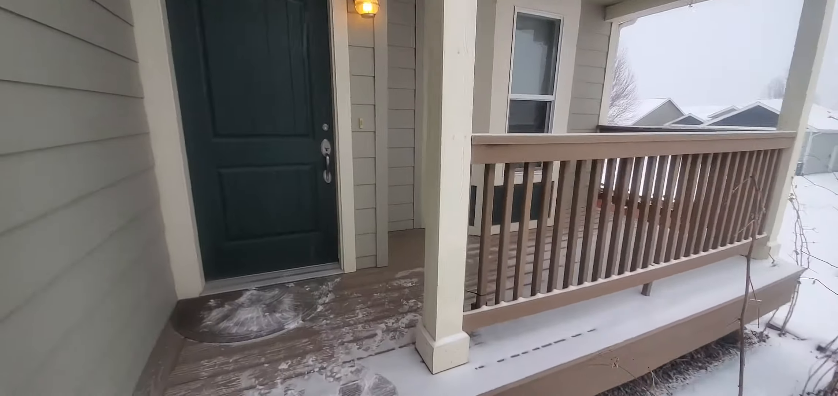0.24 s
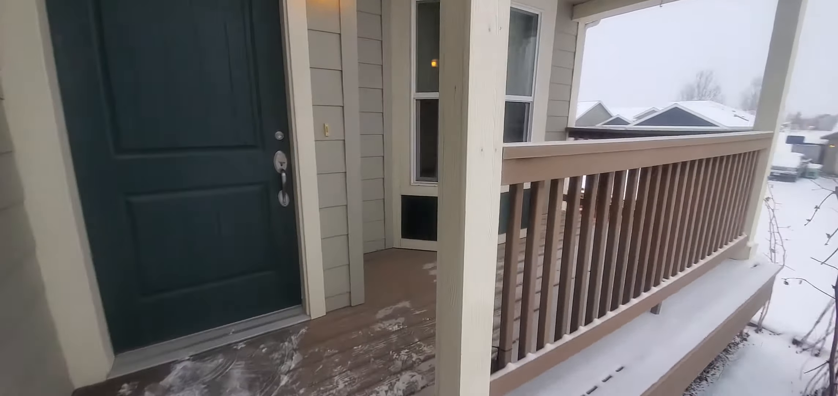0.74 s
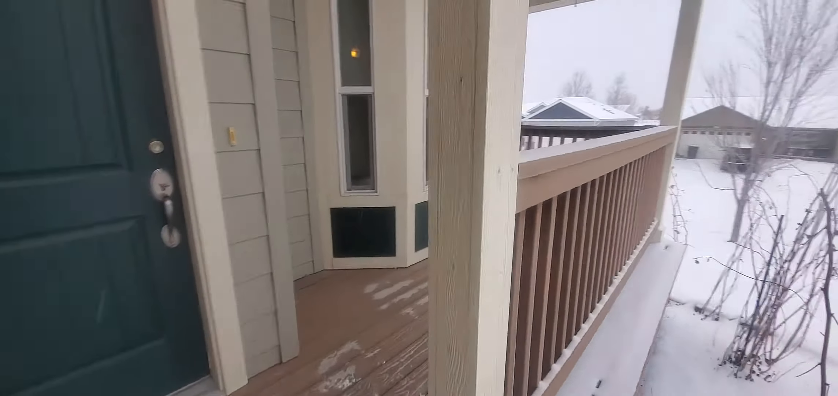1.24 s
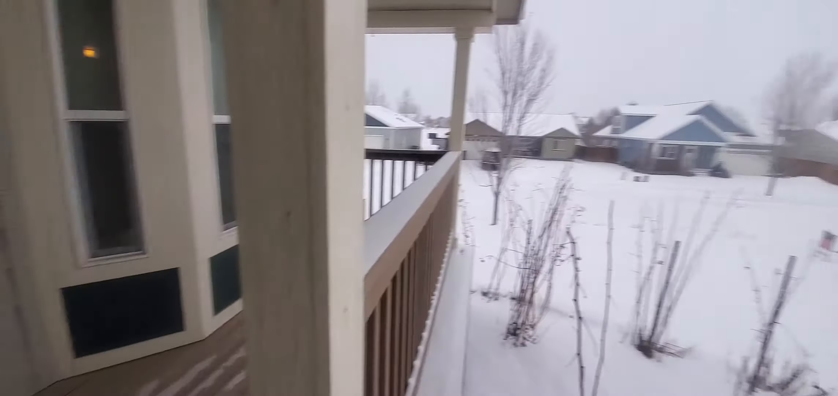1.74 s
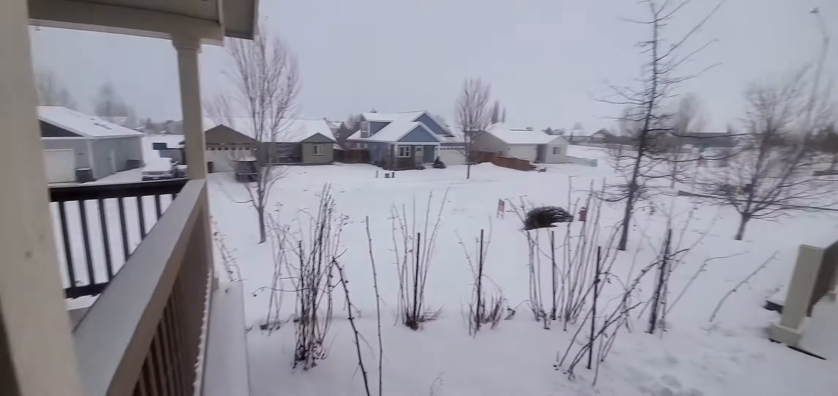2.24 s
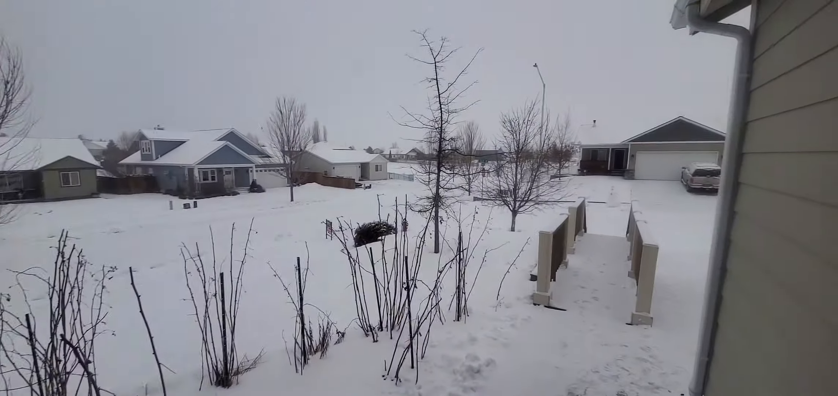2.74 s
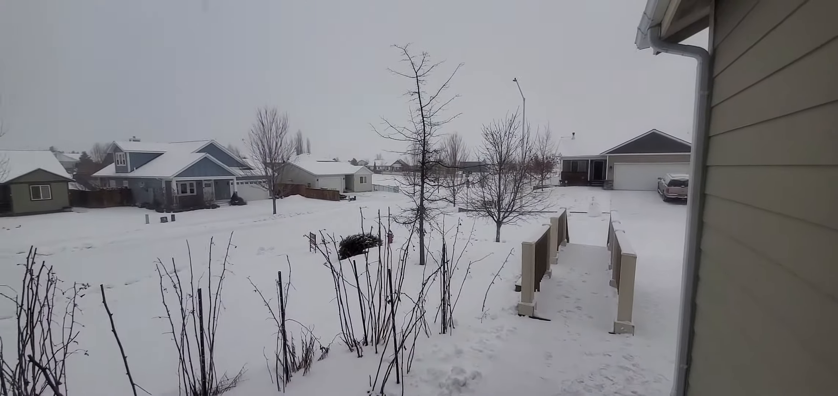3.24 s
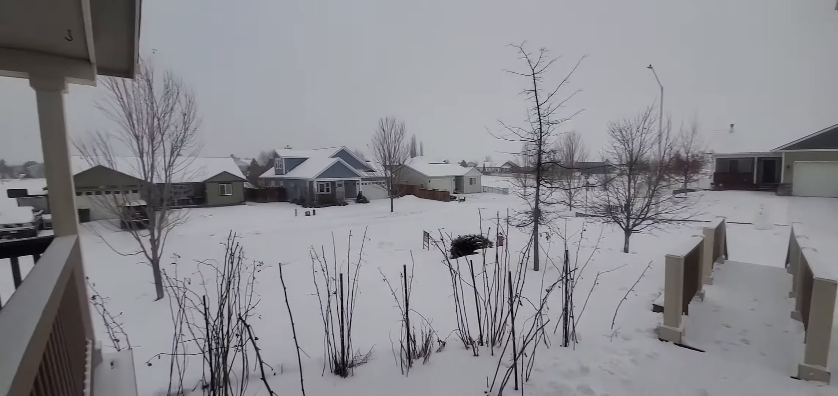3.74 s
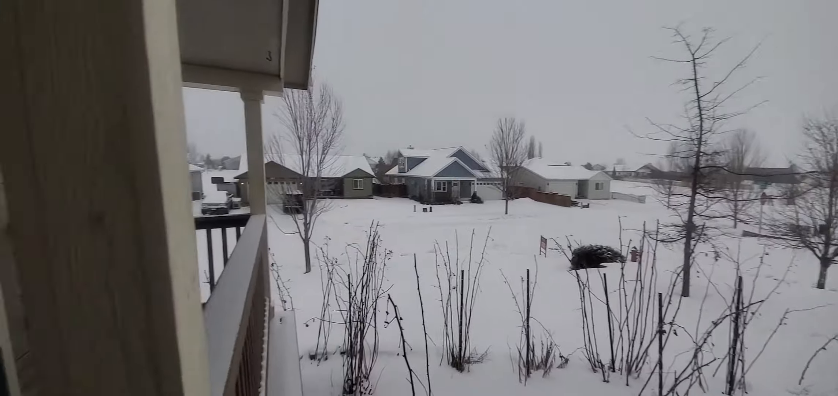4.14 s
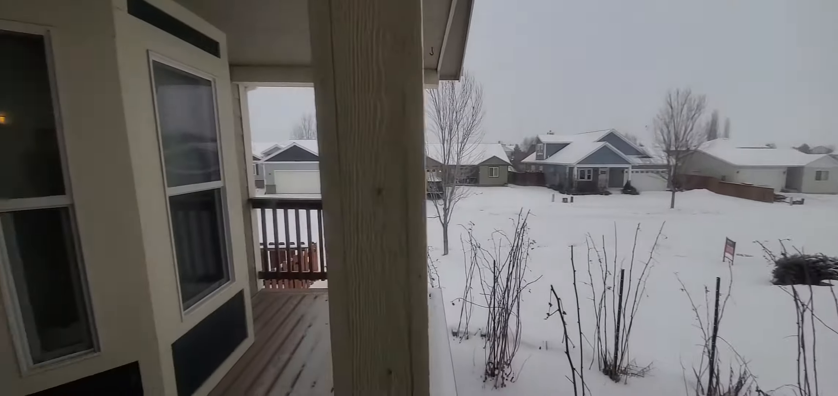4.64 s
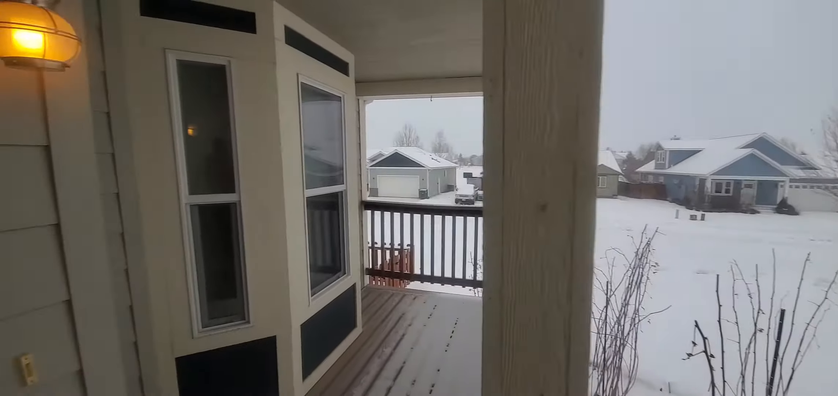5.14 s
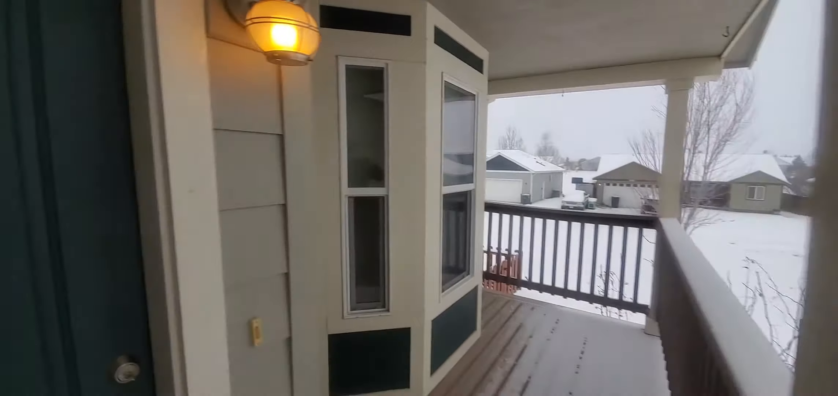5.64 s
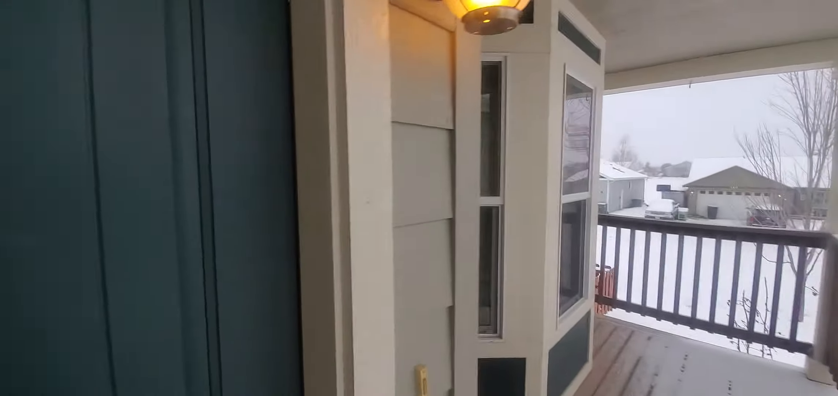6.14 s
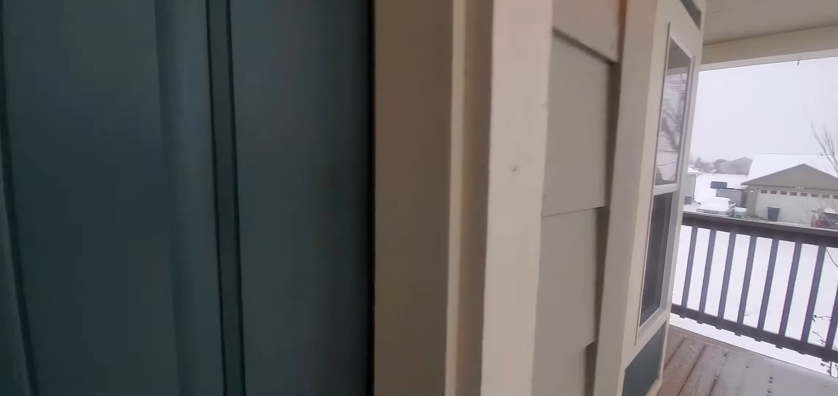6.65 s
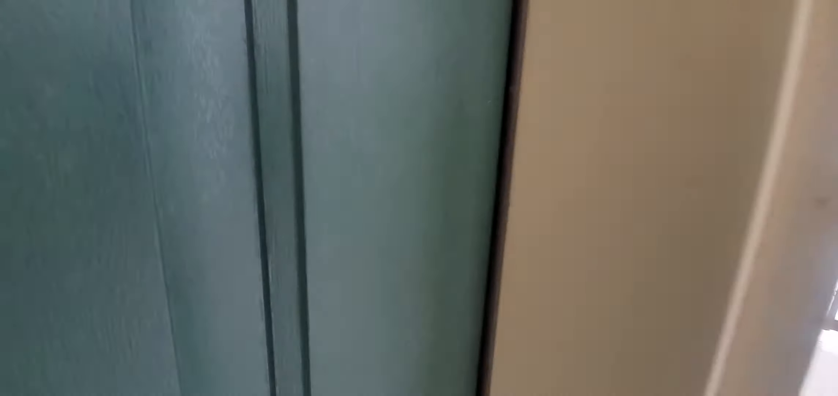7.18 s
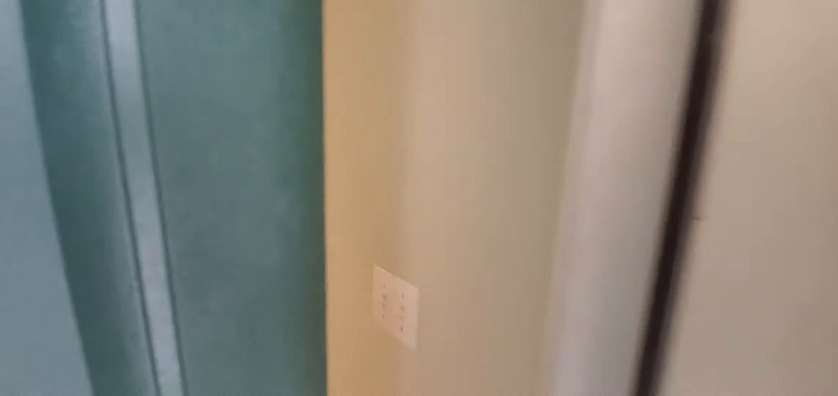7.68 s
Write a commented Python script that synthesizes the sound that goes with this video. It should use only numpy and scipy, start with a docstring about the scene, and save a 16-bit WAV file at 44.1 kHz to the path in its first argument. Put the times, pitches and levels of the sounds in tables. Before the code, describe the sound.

Snow crackles under shifting boots beside a quiet street; heavy thumps hit a porch deck, followed by a sharp metallic latch clack and door boom.

```python
"""Boots crunch through snow, stop on bare boards and stamp three times; a latch rattles and a door is jolted.
Snow is grainy noise and damped rings under a load curve; deck and door are ringing modes with slaps of noise.
Latch and spindle add steel noise, knocks and a rising squeak; a porch tail answers.
Wind and grip rumble on both ports of a handheld camera and knocks hit its shell, under a treble hiss
of clothes and air, mostly above 8 kHz, strongest near 12.6 kHz where the microphone resonates."""
import sys
import numpy as np
from scipy import signal
from scipy.fft import rfft, irfft, next_fast_len
from scipy.io import wavfile
from scipy.ndimage import uniform_filter1d, map_coordinates

SR = 44100
rng = np.random.default_rng(int(sys.argv[2]) if len(sys.argv) > 2 else 0)


def file_out(sig):
    """Save sig as 16-bit WAV at sys.argv[1]."""
    # one column per channel
    cols = np.atleast_2d(sig).T
    # limit, then scale
    lim = np.clip(cols, -1, 1)
    pcm = np.round(lim * 32767).astype(np.int16)
    wavfile.write(sys.argv[1], SR, pcm)


def volts_from_db(level):
    """Convert decibel levels to linear amplitude ratios."""
    exponent = np.asarray(level, float) / 20
    return 10 ** exponent


N = 348988


def unit(x):
    """Scaled to rms 1."""
    return x / np.sqrt(np.mean(x ** 2) + 1e-20)


def stereo_noise():
    """Unrelated white noise for the two ports."""
    return rng.standard_normal((2, N))


def decay(t, t60_s):
    """Exponential fall of 60 dB in t60_s."""
    return volts_from_db(-60 * t / t60_s)


def onset(t, rise_s):
    """Exponential approach to 1 with time constant rise_s."""
    return 1 - np.exp(-t / rise_s)


def along(points, hz):
    """Points of frequency and value read on a log frequency axis."""
    f, v = np.transpose(points)
    return np.interp(np.log(hz + 1), np.log(f + 1), v)


def curves(rows):
    """One value per sample for each column after the time."""
    s, *cols = np.transpose(rows)
    return [np.interp(np.arange(N) / SR, s, c) for c in cols]


def wobble(rate_hz):
    """Smooth random curve for each port, rate_hz knots a second (below 60)."""
    knots = rng.standard_normal((2, int(N * 60 / SR) + 4))
    return np.array([map_coordinates(k, [np.arange(N) * rate_hz / SR]) for k in knots])


def filtered(x, response):
    """x times a complex response of frequency."""
    m = next_fast_len(x.shape[-1] + 8192)
    return irfft(rfft(x, m) * response(np.fft.rfftfreq(m, 1 / SR)), m)[..., :x.shape[-1]]


def coloured(x, spectrum):
    """x shaped by the given spectrum, rms 1."""
    return unit(filtered(x, lambda hz: volts_from_db(along(spectrum, hz))))


def resonance(hz, width_hz):
    """Causal response of one damped mode."""
    return lambda f: 1j * f * width_hz / (hz * hz - f * f + 1j * f * width_hz)


def sides(pan_db):
    """Column of left and right gains, pan_db apart."""
    return volts_from_db(np.array([[pan_db / 2], [-pan_db / 2]]))


def add(track, s, sound):
    """Mix a sound in at time s."""
    part = track[..., round(s * SR):][..., :sound.shape[-1]]
    part += sound[..., :part.shape[-1]]


# likeness of the two ports: freq_hz, correlation (0-1)
PORT_LIKENESS = [(60, 0.027), (150, 0.1), (380, 0.74), (950, 0.093), (2380, 0.12), (5980, 0.0082),
                 (15000, 0.01)]


def paired(pair):
    """Two unrelated signals mixed, as sum and difference, to the likeness of the two ports."""
    def mid_side(hz):
        turn = np.arccos(np.clip(along(PORT_LIKENESS, hz), -1, 1)) / 2
        return np.array([np.cos(turn), np.sin(turn)])

    mid, side = filtered(pair, mid_side)
    return np.array([mid + side, mid - side])


def grainy(rate_hz, spread_db, life_s):
    """Noise in short bursts of uneven size, timed alike at both ports."""
    hits = rng.random(N) < rate_hz / SR
    sizes = hits * volts_from_db(spread_db * rng.exponential(1, N).clip(0, 4))
    shape = signal.lfilter([1], [1, -np.exp(-1 / (life_s * SR))], sizes)
    return paired(shape * stereo_noise())


# quiet street: freq_hz, relative_db
STREET_SPECTRUM = [(180, -23), (300, 4.5), (411, -3.5), (520, 1.5), (774, -7.5), (1920, -19), (7170, -72.5),
                   (8000, -68), (10400, -29), (17600, -120)]


def street():
    """Steady coloured noise of a quiet street."""
    return volts_from_db(-65.5) * coloured(paired(stereo_noise()), STREET_SPECTRUM)


# boots taking weight, shifting, turning: full_load_s, loading_s, unloading_s, crunch_db, thud_db
STEPS = [(0.0, .05, .15, -49, -54), (0.2, 0.16, 0.15, -42, -43), (0.45, 0.22, 0.75, -53.5, -66),
         (0.709, 0.11, 0.18, -45.5, -41.5), (0.99, 0.05, 0.18, -53, -56), (1.232, 0.22, 0.21, -38.5, -51),
         (1.52, 0.13, 0.049, -61.5, -49), (1.75, 0.24, 0.6, -53.5, -48), (1.949, 0.32, 0.11, -42, -40),
         (2.2, 0.084, 0.082, -87, -48.5), (2.44, 0.06, 0.09, -64.5, -47.5), (2.528, .03, 0.076, -50, -46.5),
         (2.75, .1, 0.19, -59.5, -43.5), (2.9, 0.11, 0.073, -55.5, -45), (3.04, 0.015, 0.11, -66.5, -41.5),
         (3.43, 0.15, 0.043, -81, -47), (3.67, 0.42, 0.21, -63, -49), (3.8, 0.066, 0.37, -62, -59),
         (4.362, 0.17, 0.093, -47.5, -43.5), (4.62, 0.28, 0.36, -61.5, -49),
         (4.919, 0.028, 0.039, -61.5, -47), (5.051, 0.095, 0.054, -61, -47), (5.2, 0.1, 0.13, -49.5, -38),
         (5.45, 0.13, 0.17, -48.5, -41.5), (5.66, .08, 0.082, -65, -51.5), (5.86, .1, 0.18, -53.5, -51),
         (6.37, 0.16, 0.56, -61.5, -57.5), (6.8, 0.087, 0.24, -60.5, -43), (7.3, 0.3, 0.27, -57, -45),
         (7.57, 0.13, 0.27, -57, -47), (7.85, .15, 0.27, -63.5, -60)]


def load():
    """Gains of crunch and thud: each step is 20 dB down a loading or unloading time from full load."""
    s, rise_s, fall_s, crunch_db, thud_db = np.transpose(STEPS)[..., None]
    t = np.arange(0, N / SR + .01, .002)
    away = np.abs((t - s) / np.where(t < s, rise_s, fall_s))
    gains = []
    for db in (crunch_db, thud_db):
        steps = volts_from_db(db - 20 * away ** 1.51)  # exponent 1 = pointed load, 2 = bell
        total = np.sqrt(np.sum(steps ** 2, axis=0))
        gains.append(np.interp(np.arange(N) / SR, t, total))
    return gains


# wind on the ports and treble hiss: time_s, wind_db, hiss_db
AIR = [(0.0, -43, -55), (0.5, -34.5, -56), (0.75, -45.5, -48), (1.2, -36.5, -48.5), (1.6, -38.5, -52.5),
       (1.95, -28.5, -48.5), (2.1, -44, -55.5), (2.35, -43.5, -60), (2.58, -29.5, -53), (2.75, -51, -55.5),
       (3.2, -44.5, -59.5), (3.62, -34.5, -51), (3.85, -45.5, -53.5), (4.2, -42, -59.5), (4.75, -48.5, -64),
       (5.25, -38.5, -57), (5.7, -54.5, -54.5), (5.95, -47, -53.5), (6.25, -46, -51.5), (6.4, -38, -48),
       (6.7, -49.5, -50), (6.9, -34.5, -60.5), (7.14, -54, -54.5), (7.3, -32.5, -54), (7.6, -42, -55),
       (7.91, -28.5, -56.5)]
# rumble of wind and grip: freq_hz, relative_db
BUFFET_SPECTRUM = [(12, -17.5), (20, 2.5), (47, 0), (70, 2.5), (86, 0.5), (119, -8.5), (200, -17),
                   (260, -54), (440, -120)]


def wind_and_grip():
    """Low noise in gusts, unrelated at the two ports; each thud also shakes the grip."""
    (wind_db, _), (_, thud_gain) = curves(AIR), load()
    buffet = unit(volts_from_db(2.36 * wobble(14)) * coloured(stereo_noise(), BUFFET_SPECTRUM))
    gain = volts_from_db(wind_db + 1.2 * wobble(6)[0]) + volts_from_db(0.5) * thud_gain
    return gain * buffet * sides(4.95)


# treble of clothes and air, mostly above 8 kHz: freq_hz, relative_db
HISS_SPECTRUM = [(4290, -26.5), (7300, -33.5), (7610, -45), (8140, -15), (8750, -9.5), (12600, 2),
                 (15200, -4.5), (15800, -7), (16300, -29), (16500, -81)]


def clothes_and_air():
    """Treble noise, part grains and part flicker; each crunch stirs the clothes."""
    (_, hiss_db), (crunch_gain, _) = curves(AIR), load()
    grains = 0.62 * unit(grainy(rate_hz=210, spread_db=1.5, life_s=0.0022))
    flicker = volts_from_db(3.7 * wobble(25)) * stereo_noise()
    gain = volts_from_db(hiss_db) + volts_from_db(-17.5) * crunch_gain
    return gain * coloured(grains + flicker, HISS_SPECTRUM) * sides(5.1)


# knocks on the camera body: start_s, level_db, click_relative_db
TAPS = [(1.469, -20.5, -32), (2.426, -23, -34), (3.447, -18.5, -42), (5.36, 1.5, 0), (5.4142, -9, -36)]
# camera body in the hand: mode_hz, relative_db, t60_s
SHELL_MODES = [(75.5, -1.5, 0.067), (207, 1, 0.018), (475, -31, 0.12)]


def taps():
    """A knock on the shell shakes the two ports in opposite directions, the left far more."""
    out, t = np.zeros(N), np.arange(SR // 10) / SR
    ring = np.zeros(len(t))
    for hz, level_db, t60_s in SHELL_MODES:
        recoil = np.pi * (hz < 150)  # the hand recoils
        ring += volts_from_db(level_db) * decay(t, t60_s) * np.cos(2 * np.pi * hz * t - recoil)
    for s, db, click_db in TAPS:
        click = volts_from_db(click_db) * decay(t, 0.00064) * np.sin(2 * np.pi * 2600 * t)
        add(out, s, volts_from_db(db) * (ring * onset(t, 0.0003) + click))
    return out * np.array([[1], [-.27]])


# slides of sole, sleeve, door seal: start_s, length_s, level_db, centre_hz, width_hz (per filter pass), left_right_db
SLIDES = [(0.114, 0.19, -43, 1640, 1660, 1), (0.609, 0.19, -48, 1580, 2000, 0),
          (1.178, 0.082, -33, 1250, 756, -3), (1.252, 0.2, -56, 2670, 2600, 2),
          (1.696, 0.46, -54, 2900, 2130, 8), (1.93, 0.1, -38.5, 1850, 1510, -0.5),
          (2.505, 0.061, -49, 2080, 1890, 2), (2.588, 0.42, -62, 1800, 700, 0),
          (4.299, 0.13, -47.5, 830, 700, -2.2), (5.363, 0.08, -62, 2960, 4000, 14),
          (5.432, 0.092, -46, 2970, 2980, 11), (7.146, 0.79, -59, 1560, 1070, -5)]


def slides():
    """Rubbing noise in one broad resonance, passed three times, with a quick rise and a slower fall."""
    out = np.zeros((2, N))
    for s, length_s, db, hz, width_hz, pan_db in SLIDES:
        u = np.arange(0, 1, 1 / (length_s * SR))
        band = resonance(hz, width_hz)
        grit = .4 + unit(uniform_filter1d(rng.exponential(1, SR) ** 4, size=130))  # catches unevenly
        noise = grit * rng.standard_normal((2, SR))
        rub = unit(filtered(noise, lambda f: band(f) ** 3))[:, :len(u)]
        swell = np.sin(np.pi * u ** 0.73) ** 1.4
        add(out, s, volts_from_db(db) * swell * rub * sides(pan_db))
    return out


def crushing(rate_hz, spread_db, sharpness):
    """Snow grains: nine bands of bursts, each ringing briefly at its own pitch."""
    total = np.zeros((2, N))
    for hz in np.geomspace(500, 4500, num=9):
        bursts = grainy(rate_hz, spread_db, life_s=0.0028)
        total += unit(filtered(bursts, resonance(hz, hz / sharpness))) * np.sqrt(hz)
    return total


# dull thud: freq_hz, relative_db
THUD_SPECTRUM = [(71, -16), (120, -11), (226, 4), (398, -7), (478, -9.5), (800, -20.5), (1040, -66),
                 (1760, -120)]
# snow packing: freq_hz, relative_db
CRUNCH_SPECTRUM = [(210, -18), (350, -5.5), (573, -6.5), (976, -6), (1230, -12), (1400, -12), (3400, -25),
                   (4580, -36.5), (7410, -43), (7800, -39.5), (10100, -58), (17200, -120)]


def boots():
    """Under the load of each step, boots thud in dull grains and pack the snow in bright ones."""
    crunch_gain, thud_gain = load()
    thud = coloured(grainy(rate_hz=90, spread_db=0, life_s=0.0099), THUD_SPECTRUM)
    packing = unit(crushing(rate_hz=270, spread_db=4, sharpness=2.1)) + 0.5 * paired(stereo_noise())
    return thud_gain * thud * sides(1.2) + crunch_gain * coloured(packing, CRUNCH_SPECTRUM)


def crackle(count):
    """Rows of further breaks at random moments, their level following the crunch around them."""
    snow_ends_s = 5.3  # boots reach bare boards
    s = rng.random(count) * snow_ends_s
    size, pitch, side = rng.standard_normal((3, count))
    crunch_db = 20 * np.log10(load()[0][(s * SR).astype(int)] + 1e-9)
    db = crunch_db + 9 + 3 * size
    hz = 1300 * np.exp(.3 * pitch)
    return list(zip(s, db, hz, np.full(count, -15), 4 * side))


# crust breaks and creaks at set moments: start_s, level_db, ring_hz, treble_relative_db, left_right_db
SNAPS = [(0.188, -43, 1360, -16, -5), (0.214, -30, 1770, -10, 1), (0.324, -39.5, 905, -21, 12),
         (0.379, -35.5, 2000, -15, -2), (0.476, -38.5, 1150, -16, 5), (0.403, -41.5, 790, -23, -2),
         (0.545, -31, 1470, -3, 6), (0.993, -30, 1290, -12, 2), (1.11, -32, 1000, -19, -1.5),
         (1.142, -41, 826, -27, 13), (1.194, -32.5, 1420, -23.5, -10), (1.371, -32, 1550, 2, 1),
         (1.614, -48.5, 1100, -8, -9.5), (1.632, -40, 1020, -13, 5), (1.659, -32, 1660, -21, 2),
         (1.705, -30, 1530, 1, 2), (1.731, -37, 1300, -12, -10), (1.77, -34.5, 1480, -12, 0),
         (1.791, -28, 2400, -12, 7), (1.748, -28.5, 1670, 0, 1), (1.805, -28, 1220, 2.5, -4),
         (1.84, -30, 1040, -14, 10), (1.868, -27.5, 918, -0.5, -7), (1.895, -25.5, 940, -26, -4.5),
         (1.944, -37, 1680, -21, 15), (2.518, -32.5, 1740, 3, -1), (2.605, -44, 1920, -8, 0),
         (2.737, -43.5, 1180, 12, 2), (2.817, -32.5, 1830, 4, -1), (2.86, -47, 1920, -9, 4),
         (2.889, -35.5, 1840, -4, -6), (2.922, -45, 2230, -8, 2), (3.018, -36, 1830, 3, -3),
         (3.78, -36, 1920, -21, -7), (4.129, -47, 1370, -9, -1), (4.213, -46, 900, -3, 3),
         (4.324, -41, 930, -21, 2), (4.598, -43, 1280, -23, 7), (4.663, -43, 1610, -21, -2),
         (4.741, -44.5, 1450, -16, -4), (4.913, -49, 920, -9, 2), (5.045, -44.5, 1180, -11, 1.2),
         (5.148, -40.5, 860, 1, 8), (5.2, -45, 2400, -15, 4), (5.217, -37, 830, -9, -5)]
# crust breaking: freq_hz, relative_db
TICK_SPECTRUM = [(300, -6.5), (700, -3), (1500, 12.5), (2600, -2.5), (4000, -16.5), (5200, -36.5),
                 (7500, -25)]


def snaps():
    """Each break is a short damped ring at its own pitch, a broad tick, a spit of treble and a dull settling."""
    out, t = np.zeros((2, N)), np.arange(SR // 12) / SR
    port_phase = np.array([[.4], [-.4]])
    for s, db, hz, treble_db, pan_db in SNAPS + crackle(count=150):
        noise = rng.standard_normal((3, 2, len(t)))
        ring = 0.7 * decay(t, 0.011) * np.sin(2 * np.pi * hz * t + port_phase)
        tick = 0.9 * (decay(t, 0.011) + .15 * decay(t, 0.07)) * coloured(noise[0], TICK_SPECTRUM)
        spit = volts_from_db(treble_db) * decay(t, 0.0043) * coloured(noise[1], HISS_SPECTRUM)
        settle = 0.5 * onset(t, 0.0029) * decay(t, 0.071) * coloured(noise[2, 0], THUD_SPECTRUM)
        snap = onset(t, 0.00062) * (ring + tick + spit + settle)
        add(out, s, volts_from_db(db) * snap * sides(pan_db))
    return out


# handle spindle: start_s, length_s, level_db, first_hz, last_hz
SQUEAK = [(6.851, 0.0434, -39, 826, 1164)]


def squeak():
    """The spindle slips faster as the handle turns: a short, unsteady rising tone."""
    s, length_s, db, first_hz, last_hz = SQUEAK[0]
    out, u = np.zeros(N), np.arange(0, 1, 1 / (length_s * SR))
    shake = unit(uniform_filter1d(rng.standard_normal(SR // 5), size=60))[:len(u)]
    pitch_hz = (first_hz + (last_hz - first_hz) * u) * (1 + 0.2 * shake)
    tone = np.sin(2 * np.pi * np.cumsum(pitch_hz) / SR)
    add(out, s, volts_from_db(db + 1.5 * shake) * np.sin(np.pi * u) * tone)
    return out


# handle and latch: start_s, level_db, knock_relative_db, fall_20db_s, knock_hz
LATCH = [(6.811, -29, -15, 0.012, 1770), (6.87, -16.5, -13, 0.0066, 1210), (6.906, -43, -16, 0.0074, 1530),
         (7.101, -1.5, -18.5, 0.011, 1850), (7.253, -40.5, -1, 0.015, 1540),
         (7.543, -19.5, -20.5, 0.0097, 1560), (7.59, -28, -4, 0.0071, 1650),
         (7.66, -32.5, -16, 0.0037, 1570), (7.682, -36, -29, 0.0071, 1500), (7.73, -38, -19, 0.0071, 1590),
         (7.86, -39, -14, 0.013, 1600)]
# latch rattle: freq_hz, relative_db
STEEL_SPECTRUM = [(1760, -41), (3000, -33), (4290, -22.5), (4910, -16), (7480, -28), (8320, -10.5),
                  (13000, 6.5), (15300, -7.5), (16000, -6), (16500, -44)]
# small steel part ringing on: mode_hz, relative_db, t60_s
STEEL_PARTS = [(11500, -22.5, 0.14)]


def latch():
    """Loose steel parts rattle for a moment, knock the hollow lock case and ring on."""
    out, t = np.zeros(N), np.arange(SR // 4) / SR
    for s, db, knock_db, fall_s, knock_hz in LATCH:
        noise = rng.standard_normal((2, len(t)))
        swell = onset(t, 0.0026) * (volts_from_db(-20 * t / fall_s) + 0.015 * decay(t, 0.099))
        rattle = coloured(noise[0], STEEL_SPECTRUM)
        knock = unit(filtered(noise[1], resonance(knock_hz, knock_hz / 2.7)))
        add(out, s, volts_from_db(db) * swell * (rattle + volts_from_db(knock_db) * knock))
        for hz, level_db, t60_s in STEEL_PARTS:
            strength = volts_from_db(db + level_db + rng.normal(0, 1.3))
            add(out, s, strength * decay(t, t60_s) * np.sin(2 * np.pi * hz * t))
    return out


# loose boards clattering after a contact: delay_s, relative_db
BOUNCE = [(0, 3.5), (.007, -2.5), (0.018, -14.5), (0.034, -21)]
# sole on wood: freq_hz, relative_db
SLAP_SPECTRUM = [(290, -2), (500, -4.5), (664, -4.5), (1280, -15.5), (1610, -4.5), (2740, -19), (3170, -22),
                 (3670, -26), (5040, -42), (7500, -64), (9750, -86), (16500, -120)]


def blows(rows, modes, spread_db):
    """A soft push rings the wooden modes, each swelling over about a cycle; the contact slaps and spits."""
    boom, slap, t = np.zeros(N), np.zeros(N), np.arange(SR * 3 // 4) / SR
    hz, level_db, t60_s = np.transpose(modes)[..., None]
    upper = hz > 150
    swell = onset(t, .9 / hz)
    clatter = np.zeros(len(t))
    for delay_s, db in BOUNCE:
        clatter += volts_from_db(db) * decay((t - delay_s).clip(0), 0.024) * (t >= delay_s)
    for s, db, slap_db, soft_ms, bass_db in rows:
        chance, noise = rng.standard_normal((2, *hz.shape)), rng.standard_normal((2, len(t)))
        # a light touch hardly moves the joists
        strength = volts_from_db(level_db + np.where(upper, spread_db * chance[0], bass_db))
        pitch_hz = hz * (1 + 0.0244 * upper * chance[1])  # another board, another pitch
        ring = np.sum(strength * swell * decay(t, t60_s) * np.sin(2 * np.pi * pitch_hz * t), axis=0)
        push = np.exp(-t[:SR // 20] * 1000 / soft_ms)  # a longer push drives the upper modes less
        add(boom, s, -volts_from_db(db) * signal.fftconvolve(ring, push / push.sum())[:len(t)])

        contact_s = s + .0035 * (bass_db > -6)  # later when the bass is strong
        rattle = unit(uniform_filter1d(rng.exponential(1, len(t)) ** 4, size=150))  # uneven knocks
        envelope = onset(t, 0.00034) * (clatter + 0.091 * decay(t, 0.47) * rattle)
        add(slap, contact_s, volts_from_db(slap_db) * envelope * coloured(noise[0], SLAP_SPECTRUM))
        spit_db = -25 + 0.61 * slap_db  # treble grows more slowly than the slap
        add(slap, contact_s, volts_from_db(spit_db) * decay(t, 0.083) * coloured(noise[1], HISS_SPECTRUM))
    return boom, slap


# door leaf jolted: start_s, boom_db, slap_db, softness_ms, bass_db
JOLTS = [(7.095, -18.5, -26, 0.36, -6), (7.103, -11.5, -20.5, 0.87, 1.2), (7.251, -12, -47, 2.67, 3.5),
         (7.289, -19.5, -66, 2.5, 3), (7.506, -35, -44, 0.64, 1), (7.625, -44, -59, 1.6, 10.5),
         (7.772, -28.5, -48.5, 2.5, -9), (7.886, -25, -50, 11, -8)]
# door leaf: mode_hz, relative_db, t60_s
DOOR_MODES = [(78.6, 1, 0.26), (143, 1.5, 0.18), (201.3, -7, 0.4), (345.7, -11.5, 0.32), (544, -36.5, 0.09),
              (636, -23, 0.15), (804, -15, 0.18)]


def door():
    """Boom and slap of the jolted leaf."""
    return blows(JOLTS, DOOR_MODES, spread_db=1.0)


# boots on the boards, toe then heel: start_s, boom_db, slap_db, softness_ms, bass_db
STAMPS = [(5.726, -8, -38, 0.35, -11.5), (5.741, 1.5, -14.5, 3, 0.6), (5.839, -28, -39, 2.1, 2),
          (6.231, -5, -36, 0.24, -35), (6.243, -2.5, -18, 1.1, -0.5), (6.37, -17.5, -60, 1.5, -5),
          (6.685, -11, -28.5, 0.27, -14), (6.702, -11.5, -28.5, 0.52, 0)]
# deck: mode_hz, relative_db, t60_s
DECK_MODES = [(64.6, -17, 0.78), (89.8, 11, 0.12), (81.33, -12, 0.73), (108, -16, 0.62), (137.1, -13, 0.52),
              (201, -14, 0.43), (210.2, -18.5, 0.27), (266.2, -13.5, 0.24), (334.6, -15, 0.21),
              (399.6, -19.5, 0.17), (562, -28, 0.086), (677, -21, 0.12), (793, -22.5, 0.15)]


def deck():
    """Boom and slap of boots stamping on boards."""
    return blows(STAMPS, DECK_MODES, spread_db=2.0)


# port levels near the door: freq_hz, left_right_db
PORT_LEVELS = [(60, 0.5), (300, 2), (500, 0), (800, -2), (1400, -9.5), (2500, 1.5), (5000, 3), (9000, 4),
               (15000, 1.5)]
# port phases near the door: freq_hz, left_lead_rad
PORT_LEAD = [(60, .05), (300, .05), (500, 0.4), (1000, 1.42), (2000, 1.9), (4000, 1.93), (8000, 1.57),
             (16400, 2)]


def at_ports(x):
    """A mono source reaches the ports with different level and phase, half the difference on each."""
    def split(hz):
        difference = np.log(volts_from_db(along(PORT_LEVELS, hz))) + 1j * along(PORT_LEAD, hz)
        return np.exp(np.outer([.5, -.5], difference))

    return filtered(x, split)


# porch decay: freq_hz, t60_s
PORCH_DECAY = [(150, 1), (600, 0.23), (1600, 0.21), (4000, 0.25), (12000, .15)]


def porch(x):
    """Walls and roof answer 200 samples late; each frequency dies at its own speed."""
    hz, t, z = signal.stft(rng.standard_normal((2, SR // 2)), SR, nperseg=256)
    fading = z * decay(t, along(PORCH_DECAY, hz)[:, None])
    tail = signal.istft(fading, SR, nperseg=256)[1]
    tail /= np.linalg.norm(tail[0])
    return signal.fftconvolve(np.pad(x, (200, 0))[None], tail, axes=1)[:, :N]


def scene():
    """Steps in the snow, then deck and door inside the porch."""
    background = street() + wind_and_grip() + clothes_and_air() + taps()
    snow = boots() + snaps()
    (deck_boom, deck_slap), (door_boom, door_slap) = deck(), door()
    boom = deck_boom + door_boom
    sharp = deck_slap + door_slap + latch() + squeak()
    reverb = porch(volts_from_db(-11.5) * sharp + volts_from_db(-33) * boom)
    return background + snow + slides() + at_ports(boom + sharp) + reverb


def roll_off(x):
    """The treble ends steeply here."""
    return signal.sosfilt(signal.butter(12, 16790, fs=SR, output="sos"), x)


def record(dry):
    """The microphone drops the deepest bass (three 36 Hz poles); peaks round off at full scale."""
    heard = filtered(dry, lambda hz: (1j * hz / (36 + 1j * hz)) ** 3)
    rounded = heard / (1 + np.abs(heard) ** 8) ** (1 / 8)
    return roll_off(rounded)


dry = scene()
out = record(dry)
file_out(out)
```